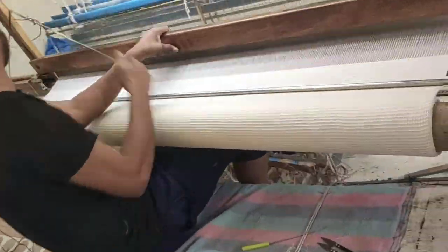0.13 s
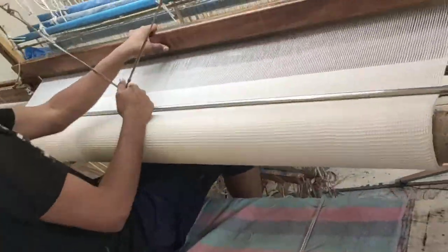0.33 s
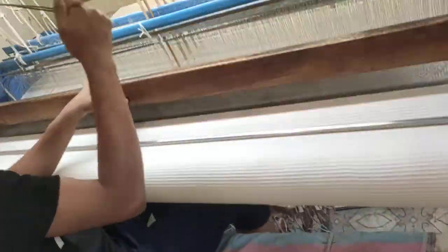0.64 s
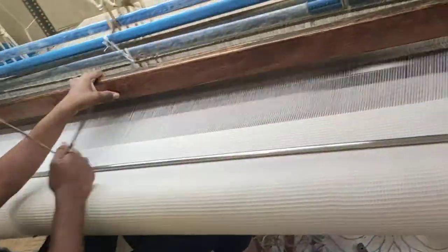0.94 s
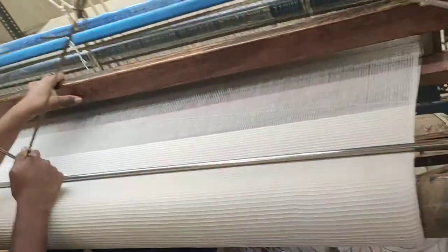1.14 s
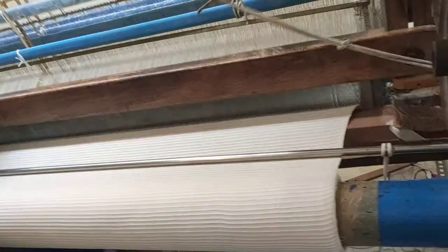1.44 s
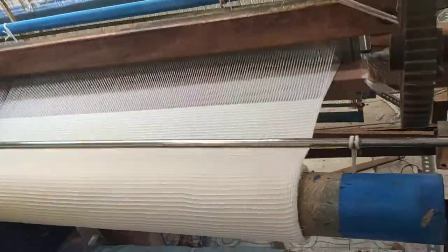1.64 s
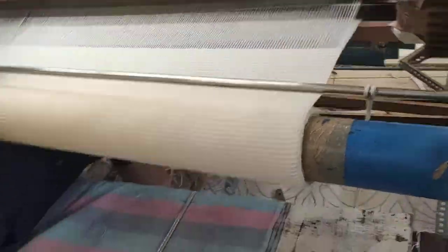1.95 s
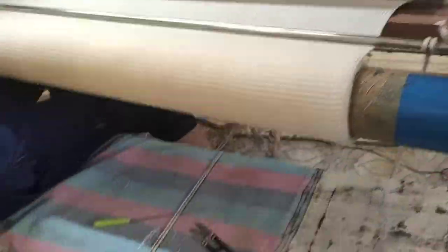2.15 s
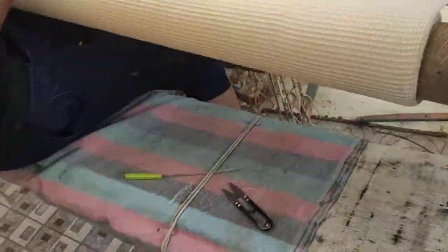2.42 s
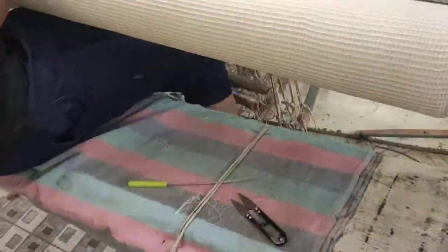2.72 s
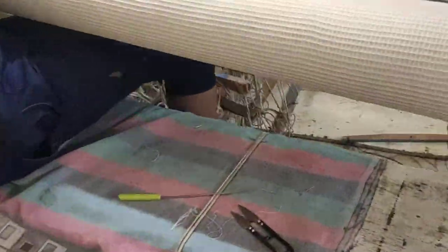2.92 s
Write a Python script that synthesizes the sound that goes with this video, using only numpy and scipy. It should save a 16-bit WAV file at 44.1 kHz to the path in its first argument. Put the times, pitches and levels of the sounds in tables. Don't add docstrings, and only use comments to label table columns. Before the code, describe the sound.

A wooden handloom at work: hard beater and shuttle slams about four per second, each followed by frame rattle and small knocks, with metallic jangles, in a hard-walled workshop with steady drone, close stereo microphone clipping.

```python
import sys
import numpy as np
from scipy import signal
from scipy.fft import rfft, irfft, next_fast_len
from scipy.io import wavfile
from scipy.ndimage import uniform_filter1d, map_coordinates

SR = 44100
rng = np.random.default_rng(int(sys.argv[2]) if len(sys.argv) > 2 else 0)


def volts_from_db(level):
    exponent = np.asarray(level, float) / 20
    return 10 ** exponent


def generate_wav(signal):
    frames = np.transpose(np.atleast_2d(signal))
    scaled = np.clip(frames, -1, 1) * 32767
    pcm = np.round(scaled).astype(np.int16)
    wavfile.write(sys.argv[1], SR, pcm)


N = 135828


def unit(x):
    return x / np.sqrt(np.mean(x ** 2) + 1e-20)


def along(points, hz):
    point_hz, value = np.transpose(points)
    return np.interp(np.log(hz + 1), np.log(point_hz + 1), value)


def wobble(rate_hz):
    knots = rng.standard_normal(int(N * rate_hz / SR) + 4)
    return map_coordinates(knots, [np.arange(N) * rate_hz / SR])


def filtered(x, response):
    size = next_fast_len(x.shape[-1] + 8192)
    spectrum = rfft(x, size) * response(np.fft.rfftfreq(size, 1 / SR))
    return irfft(spectrum, size)[..., :x.shape[-1]]


def resonance(f, hz, width_hz):
    return 1j * f * width_hz / (hz * hz - f * f + 1j * f * width_hz)


def add(track, start_s, sound):
    part = track[:, round(start_s * SR):][:, :sound.shape[1]]
    part += sound[:, :part.shape[1]]


# frequency_hz, likeness (1 = the same)
STEREO_LIKENESS = [(60, 0.68), (180, 1), (550, 0.68), (1650, -0.2), (4970, 0.13), (15000, -0.1)]


def stereo_noise(size):
    def mid_side(hz):
        angle = np.arccos(np.clip(along(STEREO_LIKENESS, hz), -1, 1)) / 2
        return np.array([np.cos(angle), np.sin(angle)])

    mid, side = filtered(rng.standard_normal((2, size)), mid_side)
    return np.array([mid + side, mid - side])


# frequency_hz, density_db_per_hz
DRONE_COLOUR = [(25, 0), (640, -4.5), (1160, 0.5), (2350, 1), (3700, -3.5), (4400, -8.5), (7900, -14.5),
                (15500, -21)]
# time_s, level_db
DRONE_SWELL = [(0, -22), (.26, -24.5), (.4, -23.5), (.8, -23), (.99, -24), (1.5, -22), (1.67, -24.5),
               (1.85, -23.5), (2.39, -24), (3.08, -23.5)]
# pitch_hz, level_db
FAN_HUM = [(100, -44.5), (132, -45.5)]


def drone():
    t = np.arange(N) / SR
    z = signal.stft(stereo_noise(N), nperseg=512)[2]
    patches = uniform_filter1d(uniform_filter1d(rng.standard_normal(z.shape[1:]), 8, 0), 8, 1)
    noise = signal.istft(z * volts_from_db(0.68 * unit(patches)), nperseg=512)[1][:, :N]
    noise = unit(filtered(noise, lambda f: volts_from_db(along(DRONE_COLOUR, f))))
    bass = filtered(noise, lambda f: f < 500)
    hiss = filtered(noise, lambda f: f > 4200)
    body = noise - bass - hiss

    level_db = np.interp(t, *np.transpose(DRONE_SWELL)) + 0.32 * wobble(26.34)
    swing = volts_from_db(level_db - level_db.mean())
    far_clatter = volts_from_db(2 * wobble(120))
    machines = bass + swing * far_clatter * body + swing ** 4.1 * hiss

    hum = np.zeros(N)
    for hz, hum_db in FAN_HUM:
        hum += volts_from_db(hum_db + 0.62 * wobble(8.0)) * np.sin(2 * np.pi * hz * t + 0.93 * wobble(9.4))
    return volts_from_db(level_db.mean() + 0.5) * machines + hum


# pitch_hz, width_hz, level_db
FRAME_MODES = [(1120, 12, -6.5), (1275, 50, 10.5), (2430, 24, -14), (2730, 154, 10), (3030, 10, -13),
               (3690, 100, 8)]
# frequency_hz, density_db_per_hz
BODY_COLOUR = [(150, -19), (500, -11), (1000, -5), (2300, -6), (3700, -4.5), (4300, -10.5), (8400, -17),
               (15000, -41)]
# frequency_hz, density_db_per_hz
CRACK_COLOUR = [(2350, -18), (4000, -14.5), (7930, -6.5), (9010, -5), (14800, -10.5), (16000, -81)]


def contact(db, note_hz, treble_db, hold_s, t60, grain_db, size):
    t = np.arange(size) / SR
    steps = np.repeat(rng.standard_normal(size // 70), 70)
    grain = volts_from_db(grain_db * np.clip(unit(uniform_filter1d(steps, size=60)), -2, 1.3))
    noise = stereo_noise(size) * grain / np.sqrt(np.mean(grain ** 2))
    shape = volts_from_db(-60 * np.maximum(t - hold_s, 0) / t60) * (1 - np.exp(-t / 0.00086))

    def wood(f):
        response = volts_from_db(11.5) * resonance(f, note_hz, 232)
        for k, (hz, width_hz, mode_db) in enumerate(FRAME_MODES):
            response = response + (-1) ** k * volts_from_db(mode_db) * resonance(f, hz, max(width_hz, 130))
        return response

    def body_colour(f):
        bass_loss_db = 0.49 * (treble_db + 28.5) * (f < 800)
        return volts_from_db(along(BODY_COLOUR, f) - bass_loss_db)

    gain = 1 / np.sqrt(np.mean(filtered(noise, wood) ** 2))
    ringing = gain * filtered(noise * shape, wood)
    body = unit(filtered(noise, body_colour))
    crack = unit(filtered(noise / grain ** 0.81, lambda f: volts_from_db(along(CRACK_COLOUR, f))))
    return volts_from_db(db) * (ringing + shape * (volts_from_db(1.5) * body + volts_from_db(treble_db + 6.5) * crack))


# start_s, peak_db, note_hz, treble_db
KNOCKS = [(0.025, -11.5, 2430, -10.5), (0.333, -12.5, 3300, -18), (0.366, -8.5, 2330, -23),
          (0.399, -12, 1130, -10), (0.558, -13, 2900, -27), (0.858, -17, 2200, -29), (1.07, -7, 2930, -10),
          (1.141, -13, 3500, -3.5), (1.359, -13.5, 2410, -17), (1.476, -10.5, 1450, -10),
          (1.493, -28, 3100, -17), (1.699, -13, 935, -17), (1.843, -9.5, 1290, -13),
          (2.016, -9.5, 1780, -27), (2.262, -10.5, 2120, -20), (2.427, -6, 2520, -17.5),
          (2.507, -7, 1110, -33), (2.907, -12, 1650, -36), (2.938, -9.5, 3500, -20),
          (2.977, -12, 2460, -48)]


def knocks():
    out = np.zeros((2, N))
    for s, db, hz, treble_db in KNOCKS:
        add(out, s, contact(db - 11.5, hz, treble_db, hold_s=0.0012, t60=0.17, grain_db=-0.5, size=SR // 5))
    return out


# start_s, peak_db, note_hz, treble_db
BLOWS_ON_WOOD = [(0.288, -2, 3400, -3.5), (0.5176, 4, 1250, -17.5), (0.745, -2, 1560, -25),
                 (1.031, 6, 2730, 1), (1.279, 0, 1270, -10.5), (1.736, -4.5, 3450, -3),
                 (1.967, 6.5, 1710, -16.5), (2.207, -6.5, 2780, -38), (2.458, -2.5, 1520, -2.5),
                 (2.708, 1.5, 3740, -18.5), (2.921, -8.5, 1630, -18)]
# contact_s, rattle_db (under the blow), rattle_note_hz, rattle_treble_db
RATTLES = [(0.00091, -13.5, 1180, 2), (0.01, -13.5, 2850, -11), (0.0029, -18, 1000, 14),
           (0.0015, -13.5, 2740, 15), (0.0093, -12.5, 3200, -2), (0.0025, -6.5, 1310, 0),
           (0.012, -18, 2500, -11), (0.004, -11.5, 1360, -8), (0.0094, -6.5, 1330, 15),
           (0.014, -11.5, 2200, -2), (0.0023, -19, 1700, -19)]


def blows():
    out = np.zeros((2, N))
    for blow, rattle in zip(BLOWS_ON_WOOD, RATTLES):
        s, db, hz, treble_db = blow
        contact_s, rattle_db, rattle_hz, rattle_treble_db = rattle
        blow_db = db - 9
        add(out, s, contact(blow_db, hz, treble_db, contact_s, t60=0.018, grain_db=-0.5, size=SR // 10))
        add(out, s, contact(blow_db + rattle_db, rattle_hz, rattle_treble_db - 26.5,
                            hold_s=0.0067, t60=0.7, grain_db=5, size=SR // 2))
    return out


# start_s, peak_db, low_note_hz, high_note_hz
WOOD_IMPACTS = [(0.289, -6.5, 1660, 3320), (0.367, -5, 1390, 2180), (0.377, -9.5, 1000, 2280),
                (0.52, 3.5, 1215, 2835), (0.527, 2, 1155, 3270), (0.547, -2, 1170, 2090),
                (0.56, 2, 1025, 2700), (0.584, -10, 1146, 2950), (0.745, 0.5, 1450, 2110),
                (0.776, -8, 1010, 4420), (0.801, -13, 1420, 2800), (0.951, -3, 1420, 2220),
                (1.031, -4, 2030, 3030), (1.036, -9, 1214, 2720), (1.048, -8, 2050, 3040),
                (1.055, -22, 1300, 3480), (1.074, -3, 980, 3000), (1.088, -10, 1155, 2130),
                (1.279, 2, 1463, 3780), (1.283, -7, 1205, 2430), (1.309, -3, 1920, 3100),
                (1.737, -15, 1550, 3200), (1.759, -4, 970, 3440), (1.967, 6, 1740, 2470),
                (1.977, 1, 1700, 3040), (1.981, 2, 1026, 3520), (1.993, -12, 1850, 3400),
                (2.018, 2, 1770, 2530), (2.208, 3, 984, 2650), (2.458, -8, 1630, 2500),
                (2.498, -5, 1080, 3060), (2.548, -22, 1330, 2360), (2.708, -5, 1160, 3440),
                (2.714, 6, 1650, 3860), (2.721, -1, 1985, 3900), (2.734, -0.5, 1257, 2260),
                (2.759, -2, 1460, 2270), (2.799, -22, 1550, 2260), (2.921, -3, 1630, 2680)]


def impacts():
    out, t = np.zeros((2, N)), np.arange(SR // 10) / SR
    for s, db, low_hz, high_hz in WOOD_IMPACTS:
        lag = np.array([[0], [.25]]) + .1 * rng.standard_normal((2, 2, 1))
        low = volts_from_db(-60 * t / 0.053) * np.sin(2 * np.pi * (low_hz * t + lag[0]))
        high = volts_from_db(5.5 - 60 * t / 0.014) * np.sin(2 * np.pi * (high_hz * t + lag[1]))
        snap = volts_from_db(-10 - 60 * t / 0.0065) * rng.standard_normal((2, len(t)))
        add(out, s, volts_from_db(db - 10) * (low + high + snap) * (1 - np.exp(-t / 0.00025)))
    return out


# start_s, peak_db, centre_hz
HEDDLE_JANGLES = [(.332, -15, 8260), (.826, -18.5, 9000), (1.002, -17.5, 10500), (1.054, -10, 9100),
                  (1.218, -29.5, 11400), (1.427, -21.5, 10100), (1.552, -15, 8470), (1.701, -30, 8600),
                  (1.841, -12.5, 7750), (2.218, -11, 6580), (2.3, -12, 7070), (2.421, -22, 7640),
                  (2.552, -12, 8570), (2.861, -21, 9800), (2.936, -9, 7200), (3.009, -16, 9640)]


def heddles():
    out, t = np.zeros((2, N)), np.arange(SR // 10) / SR
    wires, run_s, spread, t60 = 60, .015, .45, .02
    for s, db, centre_hz in HEDDLE_JANGLES:
        late, pitch, size, left, right = rng.random((5, wires, 1, 1))
        age = np.maximum(t - run_s * late ** 2, 0)
        detune = 2 * pitch - 1
        hz = np.minimum(centre_hz * np.exp(spread * detune * abs(detune)), 15500)
        phase = np.concatenate([left, right], axis=1)
        shape = volts_from_db(-12 * size - 60 * age / t60) * (1 - np.exp(-age / 0.00019))
        rings = shape * np.sin(2 * np.pi * (hz * age + phase))
        add(out, s, volts_from_db(db - 9) * rings.sum(axis=0))
    return out


# start_s, peak_db, ring_s (until caught)
PIN_CHINKS = [
    (1.444, -17, 0.0089),
    (2.218, -17, 0.035),
    (2.272, -12.5, 0.044),
]
HOOK_CHINKS = [
    (.4, -15.5, 0.026),
    (1.866, 0, 0.012),
]
WIRE_CHINKS = [
    (.627, -26.5, 0.051),
    (.674, -28.5, .045),
    (.728, -26, 0.045),
    (.876, -35, .03),
    (1.493, -19.5, .02),
    (2.147, -23, 0.017),
]
# pitch_hz, level_db
PIN_MODES = [(5017, -14), (6374, -5), (8791, -12), (9710, -2), (12142, 0), (13437, -7), (14015, -14),
             (14970, -11), (15360, -11)]
HOOK_MODES = [(6433, -2), (8064, -12), (8755, -12), (9480, 0), (10800, -5), (12230, -7), (12770, -7),
              (14920, -6)]
WIRE_MODES = [(5070, -9), (6370, -9), (7815, 0), (9730, -6), (12140, -8), (13458, -9), (14023, -10),
              (15020, -5)]


def steel():
    out, t = np.zeros((2, N)), np.arange(SR // 5) / SR
    parts = [(PIN_CHINKS, PIN_MODES, 0.17, -4), (HOOK_CHINKS, HOOK_MODES, 0.12, -12),
             (WIRE_CHINKS, WIRE_MODES, 0.083, 1)]
    for chinks, modes, t60, part_db in parts:
        hz, level_db = np.transpose(modes)[:, :, None, None]
        count = len(modes)
        for s, db, ring_s in chinks:
            size_db = level_db - level_db.max() + 2 * rng.standard_normal((count, 2, 1))
            buzz_db = 3.5 * unit(uniform_filter1d(rng.standard_normal((count, 2, len(t))), size=150))
            phase = rng.random((count, 1, 1)) + 0.27 * rng.random((count, 2, 1))
            ring = (volts_from_db(size_db + buzz_db) * np.sin(2 * np.pi * (hz * t + phase))).sum(axis=0)
            caught_db = -60 * np.maximum(t - ring_s, 0) / 0.022
            shape = volts_from_db(-60 * t / t60 + caught_db) * (1 - np.exp(-t / 0.0024))
            tick = unit(filtered(rng.standard_normal((2, len(t))), lambda f: volts_from_db(along(CRACK_COLOUR, f))))
            add(out, s, volts_from_db(db + part_db) * (ring * shape + tick * volts_from_db(1.5 - 60 * t / 0.05)))
    return out


# start_s, length_s, level_db, pitch_hz, width_hz
THIN_STEEL = [
    (.401, .016, -30, 7900, 300),
    (.627, .18, -38, 15020, 200),
    (.627, .17, -42, 13450, 120),
    (.674, .04, -41, 12140, 120),
    (.875, .04, -41, 15020, 150),
    (1.0, .025, -35, 10700, 900),
    (1.143, .014, -28, 7900, 400),
    (1.218, .055, -37, 11200, 900),
    (2.585, .03, -37, 8050, 150),
    (2.94, .03, -34, 5950, 150),
]


def thin_steel():
    out, t = np.zeros(N), np.arange(N) / SR
    for s, length_s, db, hz, width_hz in THIN_STEEL:
        band = unit(filtered(rng.standard_normal(N), lambda f: resonance(f, hz, width_hz) ** 2))
        age = t - s
        level_db = db + wobble(60) - 3.1 * np.clip(age / length_s, 0, 1)
        gate = np.clip(np.minimum(age / 0.0014, (length_s - age) / .01 + 1), 0, 1)
        out += volts_from_db(level_db) * gate * band
    return out * np.ones((2, 1))


# start_s, level_db, pitch_hz
SOFT_THUMPS = [
    (1.6, -26, 42),
    (2.63, -32, 42),
    (2.77, -30, 60),
    (1.475, -25, 400),
    (1.5, -26, 280),
    (2.21, -25, 300),
    (2.93, -26, 270),
    (.518, -18, 450),
]


def thumps():
    out, t = np.zeros((2, N)), np.arange(N) / SR
    for s, db, hz in SOFT_THUMPS:
        swell = np.exp(-((t - s) * hz / 2.2 - 1) ** 2)
        lag = 8 / hz * np.array([[0], [1]])
        out += volts_from_db(db) * swell * np.sin(2 * np.pi * (hz * t + lag))
    return out


# frequency_hz, t60_s
ROOM_DECAY = [(200, 0.086), (2000, 0.41), (6000, 0.23), (14000, 0.14)]


def workshop(x):
    hz, t, z = signal.stft(rng.standard_normal((2, SR // 2)), SR, nperseg=256)
    tail = signal.istft(z * volts_from_db(-60 * t / along(ROOM_DECAY, hz)[:, None]), SR, nperseg=256)[1]
    delayed = np.pad(x, ((0, 0), (300, 0)))
    return signal.fftconvolve(delayed, tail / np.linalg.norm(tail[0]), axes=1)[:, :N]


def scene():
    wood = knocks() + blows() + impacts()
    metal = heddles() + steel() + thin_steel()
    room = workshop(volts_from_db(-10) * wood + volts_from_db(-13) * metal)
    return drone() + wood + metal + room + thumps()


def band_limit(x):
    return signal.sosfilt(signal.butter(12, 16310, fs=SR, output="sos"), x)


# frequency_hz, left_over_right_db
STEREO_LEAN = [(60, -1.5), (180, -0.5), (550, -0.5), (1650, 1), (4970, 3.5), (15000, -1.5)]


def record(dry):
    def lean(f):
        return volts_from_db(along(STEREO_LEAN, f) * np.array([[.5], [-.5]])) * (f < 16000)

    x = filtered(dry, lean)
    hardness = 39
    clipped = x / (1 + np.abs(x) ** hardness) ** (1 / hardness)
    return band_limit(clipped)


dry = scene()
out = record(dry)
generate_wav(out)
```